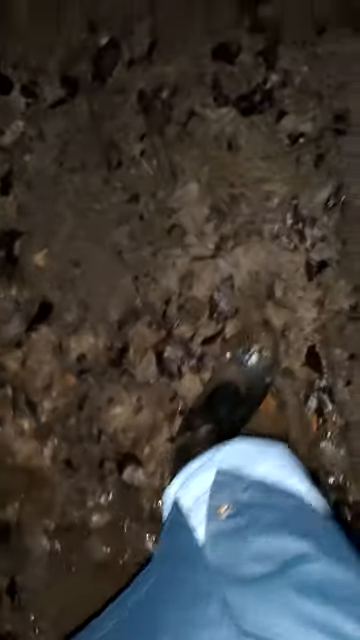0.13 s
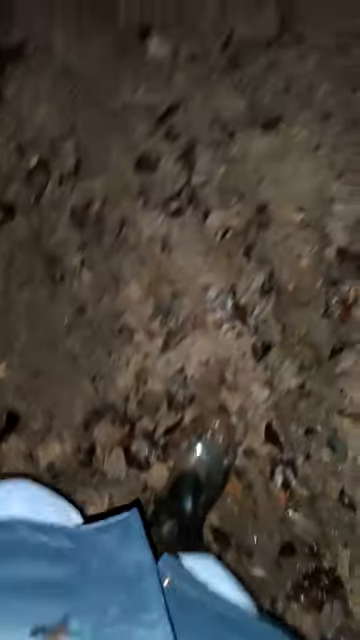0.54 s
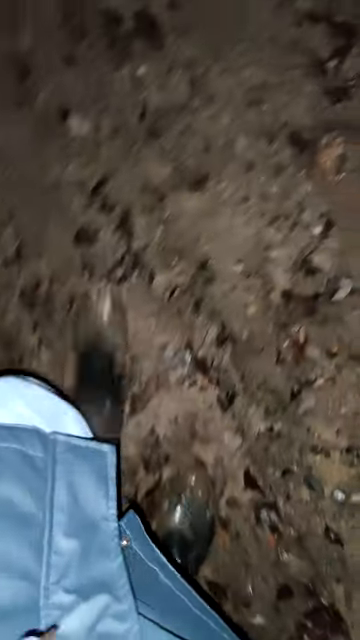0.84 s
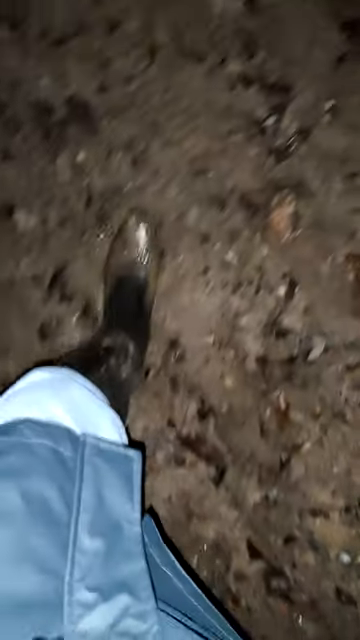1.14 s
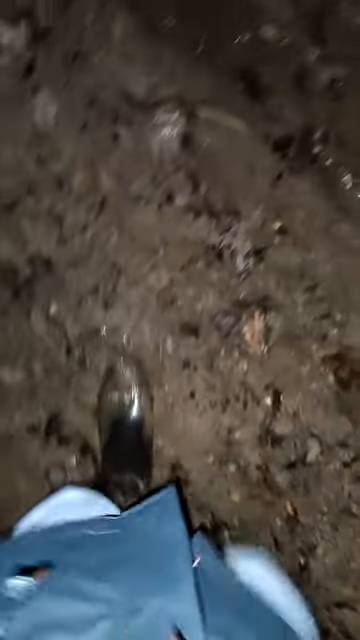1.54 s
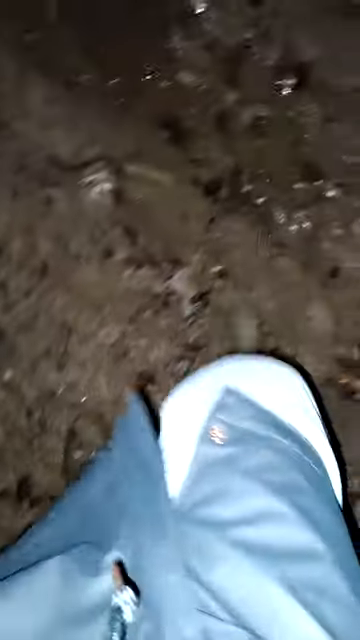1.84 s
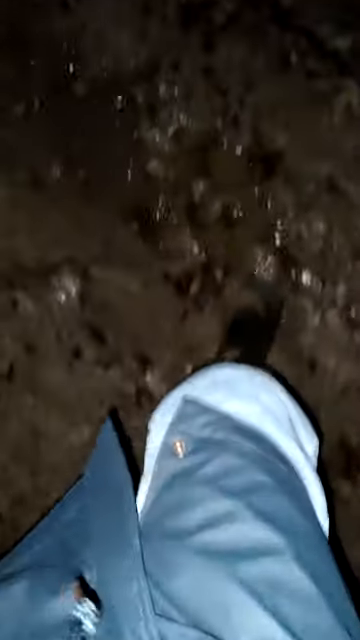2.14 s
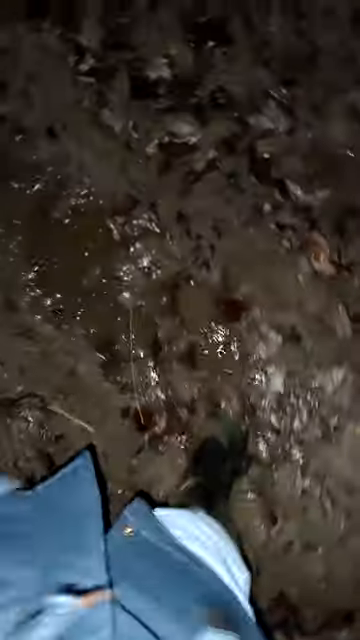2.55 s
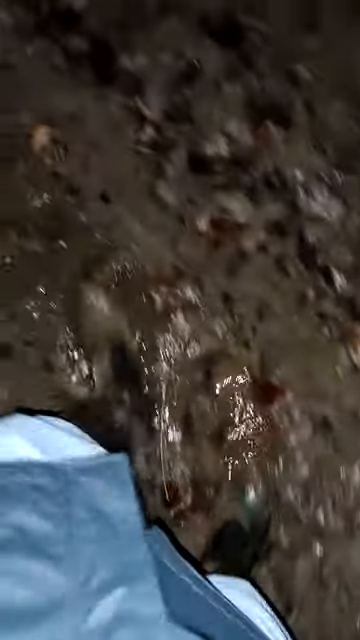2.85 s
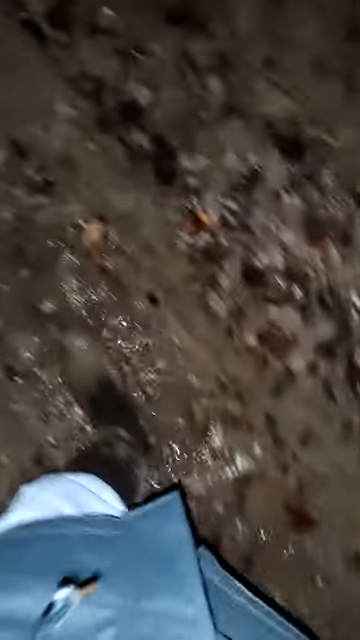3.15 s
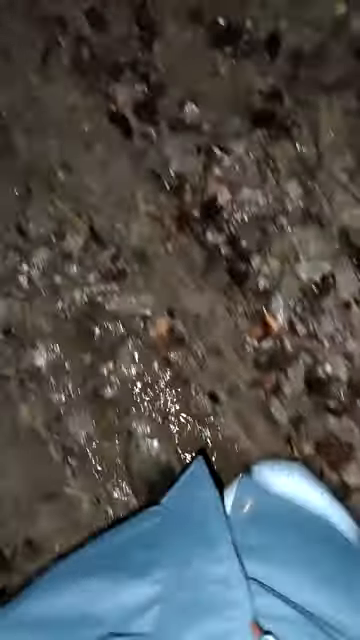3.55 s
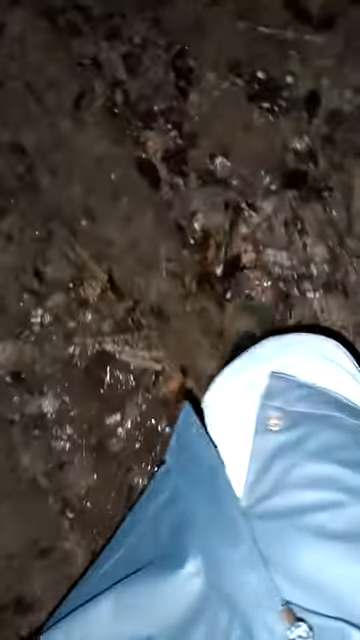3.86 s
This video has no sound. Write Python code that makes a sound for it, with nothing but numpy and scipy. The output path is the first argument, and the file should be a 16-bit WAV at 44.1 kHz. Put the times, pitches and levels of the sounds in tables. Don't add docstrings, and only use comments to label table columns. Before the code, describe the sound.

Wet muddy bootsteps suck and pop outdoors at night over faint hiss and mic rumble

```python
import sys
import numpy as np
from scipy import signal
from scipy.fft import rfft, irfft
from scipy.io import wavfile
from scipy.ndimage import uniform_filter1d

SR = 44100
rng = np.random.default_rng(int(sys.argv[2]) if len(sys.argv) > 2 else 0)


def field_ratio(decibels):
    return 10 ** (np.asarray(decibels, dtype=float) / 20)


def to_wav(sig):
    pcm = np.clip(np.atleast_2d(sig), -1, 1) * 32767
    pcm = np.round(pcm).astype(np.int16)
    wavfile.write(sys.argv[1], SR, pcm.T)


N = 176400
T = np.arange(N) / SR
SLOW_T = T[::16]


def evened(x):
    return x / np.sqrt(np.mean(x ** 2) + 1e-20)


def smoothed(x, size):
    return uniform_filter1d(uniform_filter1d(x, size=size), size=size)


def colour(x, points):
    hz = np.fft.rfftfreq(len(x), 1 / SR)
    table_hz, table_db = np.transpose(points)
    response_db = np.interp(np.log(hz + 1), np.log(table_hz + 1), table_db)
    return irfft(rfft(x) * field_ratio(response_db), len(x))


def patchy(patch_db, flicker_db):
    frames = N // 128 + 5
    real, imaginary, patch = rng.standard_normal((frames, 257, 3)).T
    patch = uniform_filter1d(patch, size=7, axis=0)
    patch = evened(uniform_filter1d(patch, size=20, axis=1))
    flicker = evened(uniform_filter1d(rng.standard_normal(frames), size=5))
    spectrum = (real + 1j * imaginary) * field_ratio(patch_db * patch + flicker_db * flicker)
    return evened(signal.istft(spectrum, nperseg=512, noverlap=384)[1][:N])


def ring(hz, t60, rise_cycles, glide):
    t = np.arange(int(t60 * SR) + 8) / SR
    onset = 1 - np.exp(-t * hz / rise_cycles)
    decay = field_ratio(-60 * t / t60)
    return onset * decay * np.sin(2 * np.pi * hz * (t + glide * t ** 2 / t60))


# (frequency [Hz], density [dB per Hz])
LEFT_HISS = [(30, -103), (70, -87), (300, -87.5), (550, -100), (1500, -99.5), (3000, -101), (6000, -105),
             (14000, -105)]
RIGHT_HISS = [(30, -80.5), (70, -81), (300, -81), (550, -91), (1500, -94), (3000, -100), (6000, -101),
              (14000, -101)]
# (time [s], level [dB])
HISS_TURNING = [
    (0, -2),
    (.8, 2.74),
    (1.1, -4),
    (1.3, 1.5),
    (3.5, 0),
    (4, 4.5),
]


def hiss():
    both, left, right = (patchy(patch_db=3, flicker_db=.3) for _ in range(3))
    shared_power = 0.1
    pair = np.sqrt(shared_power) * both + np.sqrt(1 - shared_power) * np.array([left, right])
    swell = field_ratio(np.interp(T, *np.transpose(HISS_TURNING)))
    density_to_rms = np.sqrt(SR / 2)
    return density_to_rms * swell * np.array([colour(pair[0], LEFT_HISS), colour(pair[1], RIGHT_HISS)])


# (centre time [s], half length [s], level [dB], top frequency [Hz])
WIND_GUSTS = [(0.403, 0.2, -53, 147), (0.706, 0.041, -38, 152), (0.797, 0.026, -36.5, 139),
              (0.991, 0.047, -37, 140), (1.107, 0.028, -37.5, 157), (1.163, 0.012, -39, 174),
              (1.318, 0.24, -47.5, 140), (1.474, 0.049, -32.5, 212), (1.537, 0.11, -41.5, 227),
              (1.672, 0.037, -42.5, 147), (2.508, 0.22, -50.5, 357), (2.698, 0.015, -43, 258),
              (2.908, .06, -50, 110), (3.089, 0.052, -45, 127), (3.229, 0.022, -40.5, 141),
              (3.41, 0.13, -53.5, 108), (3.875, 0.027, -53, 253)]


def wind():
    low_hz, lump_db, lump_s, leak_db = 64, 3.5, 0.0093, -44
    t = SLOW_T
    hz, out = np.fft.rfftfreq(len(t), 16 / SR), np.zeros(len(t))
    air = rfft(rng.standard_normal(len(t)))
    lumps = evened(smoothed(rng.standard_normal(len(t)), max(int(lump_s * SR / 16), 1)))
    high_pass = (hz / low_hz) ** 2 / (1 + (hz / low_hz) ** 2)
    for centre, half, level_db, top_hz in WIND_GUSTS:
        band = high_pass / (1 + (hz / top_hz) ** 4.4)
        envelope = np.exp(-abs((t - centre) / half) ** 2.3)
        out += field_ratio(level_db) * envelope * evened(irfft(air * band, len(t)))
    gusts = 16 * irfft(rfft(out * field_ratio(lump_db * lumps)), N)
    return np.array([field_ratio(leak_db) * np.roll(gusts, 21), gusts])


# (time [s], peak level [dB], width [ms])
INWARD_KNOCKS = [
    (0.343, -26, 2.8),
    (2.078, -20, 0.79),
    (1.889, -34, .7),
    (1.976, -36.5, 1.5),
    (2.082, -28, 1.46),
    (3.003, -30, 0.85),
    (3.917, -32.5, 1.2),
]
OUTWARD_KNOCKS = [
    (1.329, -28.5, 0.77),
    (1.7886, -27.5, 0.99),
    (1.883, -32, 0.88),
    (1.902, -35, 1.3),
    (2.6544, -7.5, 0.68),
    (2.68, -25.5, 2),
    (3.127, -27, 1.6),
    (3.759, -23.5, 1.16),
]


def knocks():
    rebound, rebound_widths, front_widths, leak_db = 0.26, 3.3, .3, -34
    out = np.zeros(N)
    for way, table in ((1, INWARD_KNOCKS), (-1, OUTWARD_KNOCKS)):
        for s, peak_db, width_ms in table:
            near = slice(round(s * SR) - 1024, round(s * SR) + 1024)
            u = (T[near] - s) * 1000 / abs(width_ms)
            push = np.where(u < 0, np.exp(-(u / front_widths) ** 2), np.exp(-abs(u) ** 1.72))
            recoil = rebound * np.exp(-(u / rebound_widths) ** 2)
            out[near] += way * field_ratio(peak_db - 0.5) * (push - recoil)
    return np.array([field_ratio(leak_db) * np.roll(out, 21), out])


# (start [s], end [s], level [dB])
CLOTH_STROKES = [
    (0.01, 0.362, -51.5),
    (1.464, 1.545, -44.5),
    (1.8, 1.973, -47.5),
    (2, 2.129, -42),
    (2.19, 2.294, -43),
    (2.362, 2.578, -41),
    (2.617, 2.713, -40.5),
    (2.71, 3.331, -52.5),
    (3.53, 4.012, -59),
]
# (frequency [Hz], density [dB per Hz])
FABRIC = [(150, -2), (500, -3.5), (1900, -5), (2900, -5), (3900, -3.5), (6000, -8), (9000, -8.5),
          (14000, -12)]


def cloth():
    rise_s, fall_s = .02, .009
    power = np.zeros(len(SLOW_T))
    for start, end, level_db in CLOTH_STROKES:
        opening = 1 + np.exp(np.clip((start - SLOW_T) / rise_s, -50, 50))
        closing = 1 + np.exp(np.clip((SLOW_T - end) / fall_s, -50, 50))
        power += field_ratio(level_db) ** 2 / opening / closing
    near, far = (evened(colour(patchy(patch_db=1.6, flicker_db=1.1), FABRIC)) for _ in range(2))
    return np.interp(T, SLOW_T, np.sqrt(power)) * np.array([field_ratio(-9) * far, near])


# (time [s], peak level [dB], centre frequency [Hz])
DROPS = [(0.429, -48, 6460), (.575, -49, 6800), (0.919, -43.5, 6100), (1.194, -52, 4970),
         (2.223, -40, 5830), (2.459, -38, 6900), (2.465, -36, 6200), (2.605, -38, 4800),
         (2.5657, -29, 6500), (2.5702, -20.5, 6900), (2.578, -31, 6700), (2.7999, -26.5, 6600),
         (2.887, -34, 12100), (2.94, -41, 6900), (2.962, -44, 6650), (3.003, -40, 5500), (3.04, -41, 6700),
         (3.059, -44, 6600), (3.073, -38, 6800), (3.099, -41, 5500), (3.126, -36, 5900), (3.137, -19, 5730),
         (3.159, -30, 7000), (3.187, -38, 4660), (3.191, -47, 5170), (3.256, -33, 5200), (3.3, -43, 5670),
         (3.405, -41.5, 5630), (3.862, -38, 6000)]
# (multiple of the centre [1], density [dB per Hz])
DROP_SPECTRUM = [(.1, -35), (.45, -14), (.8, -3), (1.05, 0), (1.35, -12), (2.2, -18)]


def ticks():
    crack_s, tail_s, tail_db, left_gain_db, apart = .00035, .004, -14, 3.5, 0.97
    out, t = np.zeros((2, N)), T[:1024] - T[64]
    shape = (t >= 0) * (np.exp(-t / crack_s) + field_ratio(tail_db) * np.exp(-t / tail_s))
    for (s, peak_db, hz), noise in zip(DROPS, rng.standard_normal((len(DROPS), 2, 1024))):
        spectrum = np.multiply(DROP_SPECTRUM, [hz, 1])
        burst = shape * (noise[0] + apart * noise)
        tick = np.array([colour(side, spectrum) for side in burst])
        tick = tick / abs(tick).max(axis=1, keepdims=True)
        start = round(s * SR) - 64
        out[:, start:start + 1024] += tick * field_ratio([[peak_db + left_gain_db], [peak_db]])
    return out


# (time [s], peak level [dB], frequency [Hz], 60 dB decay time [s])
AIR_POCKETS = [(0.175, -36.5, 1480, 0.033), (0.32, -34.5, 784, 0.0056), (0.521, -34.5, 742, 0.029),
               (0.523, -31.5, 2260, 0.017), (.74, -46.5, 624, 0.014), (.846, -45, 1726, 0.039),
               (2.459, -42.5, 1250, 0.032), (2.419, -50, 1950, 0.0091), (2.505, -51, 1680, 0.0099),
               (2.5148, -38, 1780, .008), (2.5244, -33, 1910, 0.0088), (2.53, -44, 2300, .01),
               (2.536, -34, 2640, .012), (2.544, -35, 1890, 0.0065), (2.5463, -30, 1700, 0.0095),
               (2.5535, -36, 2440, 0.0071), (2.557, -32, 2630, 0.011), (2.567, -38, 2250, 0.0069),
               (2.7958, -35, 282, 0.017), (2.894, -32.5, 614, 0.0088), (2.898, -35.5, 490, 0.0087),
               (3.0595, -38, 2550, 0.0058), (3.067, -36, 2300, 0.0047), (3.101, -47, 1510, .008),
               (3.1422, -30, 2740, 0.018), (3.149, -33, 2350, 0.0094), (3.167, -30, 2320, 0.0063),
               (3.18, -39, 2450, .012), (3.184, -36, 1560, 0.0087), (3.189, -45, 1700, 0.0092),
               (3.2, -53, 1980, .01), (3.353, -52, 1810, 0.011), (3.409, -44, 3170, 0.024),
               (2.863, -37, 686, .012), (2.9617, -25, 856, 0.011), (3.105, -38, 1140, 0.0074),
               (3.1255, -37, 1500, 0.011), (3.1372, -21, 2430, 0.004), (3.158, -35, 1520, 0.037),
               (3.174, -35.5, 2140, 0.04), (3.327, -39, 2540, 0.017), (3.367, -48, 1800, 0.062),
               (3.405, -39, 2570, 0.013), (3.443, -41.5, 2980, 0.015), (.003, -32.5, 396, 0.0089),
               (0.012, -31, 323, 0.014), (.03, -37, 1460, 0.015), (.042, -43, 428, .012),
               (0.059, -40, 457, 0.014)]


def pops():
    rise_cycles, glide, snap_db, snap_s = 0.79, 0.053, -12, 0.0011
    upper_ratio, upper_db, left_lag_samples, pan_db = 1.25, -5, 3, 0.5
    out = np.zeros((2, N))
    for (s, peak_db, hz, t60), noise in zip(AIR_POCKETS, rng.standard_normal((len(AIR_POCKETS), 64))):
        pop = ring(hz, t60, rise_cycles, glide)
        upper = ring(hz * upper_ratio, t60 / 2, rise_cycles, -glide)
        pop[:len(upper)] += field_ratio(upper_db) * upper
        pop[:64] += field_ratio(snap_db) * smoothed(noise, 7) * 2 * np.exp(-T[:64] / snap_s)
        pop = pop / abs(pop).max()
        right_at = round(s * SR)
        left_at = right_at + left_lag_samples
        out[0, left_at:left_at + len(pop)] += field_ratio(peak_db + pan_db / 2) * pop
        out[1, right_at:right_at + len(pop)] += field_ratio(peak_db - pan_db / 2) * pop
    return out


# (peak time [s], rise [s], fall [s], level [dB], bubble centre frequency [Hz])
MUD_CLUMPS = [(.012, 0.026, 0.026, -47.5, 334), (0.033, 0.12, 0.021, -53, 1200),
              (0.017, 0.065, 0.043, -56, 6500), (0.319, 0.07, 0.047, -65.5, 1400),
              (1.198, 0.006, 0.02, -60.5, 5200), (1.265, 0.039, 0.033, -58, 5040),
              (1.32, 0.091, 0.044, -63.5, 1400), (1.47, 0.028, 0.045, -87, 2200),
              (1.899, 0.063, 0.013, -63.5, 895), (2.188, 0.0093, 0.006, -51.5, 2150),
              (2.542, 0.086, 0.043, -54.5, 1860), (2.575, 0.034, 0.31, -60, 6250),
              (2.69, 0.087, 0.12, -63.5, 386), (2.799, 0.0024, 0.018, -59, 5730),
              (2.866, 0.0051, 0.0058, -55, 810), (2.889, 0.01, 0.013, -53.5, 680),
              (2.889, 0.0036, .008, -59, 12500), (2.865, 0.0027, 0.0069, -71, 12000),
              (2.04, 0.048, 0.041, -65, 3660), (3.061, 0.007, 0.0038, -45, 6550),
              (3.075, 0.0081, 0.0065, -53, 6600), (3.137, 0.053, 0.011, -52.5, 2000),
              (3.169, 0.023, 0.068, -54.5, 2120), (3.181, 0.057, 0.039, -50, 6400),
              (3.77, 0.051, 0.064, -64.5, 1490), (3.78, 0.076, 0.051, -62.5, 6560),
              (3.868, 0.012, 0.036, -57.5, 6700), (3.92, 0.11, 0.019, -65, 334)]


def squelch():
    spread_oct, grain_glide, shared_power = 0.86, 0.17, 0.59
    grains_per_s, grain_db, grain_cycles, clump_db, seep_db = 110, 4.4, 6.5, 1.8, -78
    out, t = np.zeros((3, N)), SLOW_T
    peak, rise, fall, level_db, centre = np.transpose(MUD_CLUMPS)[:, :, None]
    shape = field_ratio(level_db) * np.exp(-np.where(t < peak, (peak - t) / rise, (t - peak) / fall) ** 1.03)
    unevenness = field_ratio(clump_db * evened(smoothed(rng.standard_normal(N), 128)))
    alternating_sign = np.where(np.arange(N) % 2, 1, -1)
    for hz in np.geomspace(150, 14000, num=32):
        share = np.exp(-.5 * (np.log2(hz / centre) / spread_oct) ** 2)
        level = np.sqrt(((shape * share) ** 2).sum(0) + field_ratio(seep_db) ** 2)
        strength = np.interp(T, t, level) * unevenness
        draw = rng.random((N, 3)).T
        chance = grains_per_s * (1 + (hz / 2000) ** 2) / SR
        size, hit = np.zeros((3, N)), draw < chance
        rarity = np.log(np.clip(draw[hit] / chance, .01, 1))
        size[hit] = field_ratio(-grain_db * rarity) / np.sqrt(chance)
        grain = ring(hz, 3 * grain_cycles / hz, 0.11, grain_glide)
        grain = grain[None] / np.linalg.norm(grain)
        out += signal.oaconvolve(size * alternating_sign * strength, grain, axes=1)[:, :N]
    common = np.array([np.roll(out[0], 1), out[0]])
    return field_ratio(-7) * (np.sqrt(shared_power) * common + np.sqrt(1 - shared_power) * out[1:])


def scene():
    return hiss() + wind() + knocks() + cloth() + ticks() + pops() + squelch()


def top_cut(x):
    return signal.sosfilt(signal.butter(12, 14900, fs=SR, output="sos"), x)


# (frequency [Hz], gain [dB])
LEFT_MICROPHONE = [(1000, -1.2), (2700, -2.85), (3300, -3.5), (4500, -6.5), (6900, 1.5), (8900, -15.5),
                   (10000, -7.5), (14000, -6)]
RIGHT_MICROPHONE = [(1100, -1.02), (1900, 2), (2800, -2), (3300, -5), (4000, -3), (7500, -3.5),
                    (9000, -9.5), (14000, -6)]


def record(dry):
    heard = np.array([colour(dry[0], LEFT_MICROPHONE), colour(dry[1], RIGHT_MICROPHONE)])
    edge_hz = 14220
    loss_db = np.clip((np.fft.rfftfreq(N, 1 / SR) - edge_hz) / 4, 0, 62)
    mix = irfft(rfft(heard) * field_ratio(-loss_db), N)
    return top_cut(mix)


dry = scene()
out = record(dry)
to_wav(out)
```